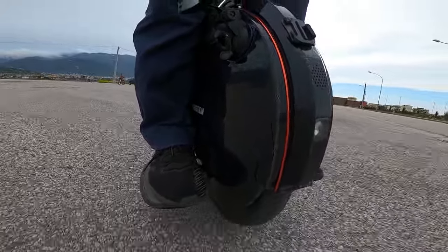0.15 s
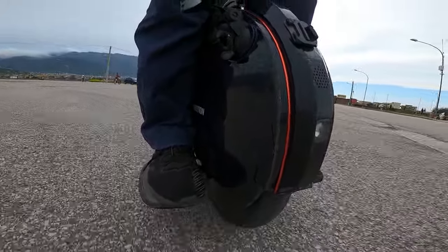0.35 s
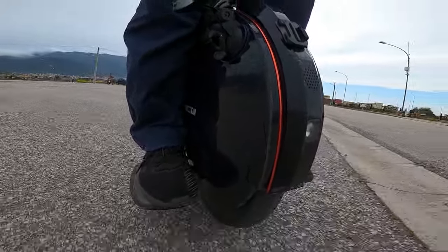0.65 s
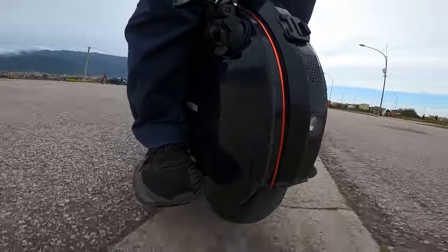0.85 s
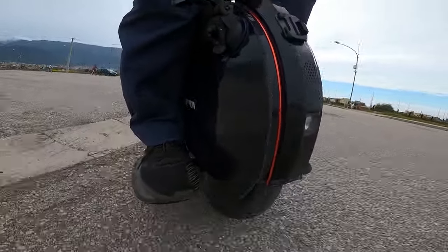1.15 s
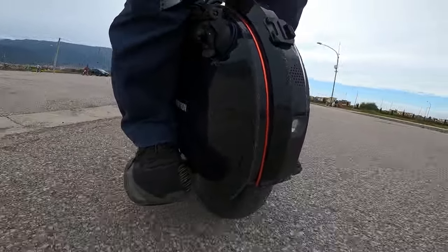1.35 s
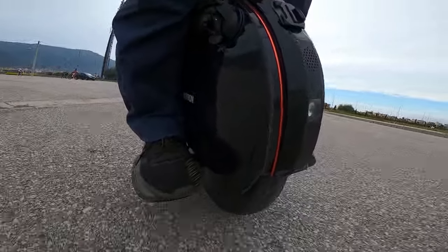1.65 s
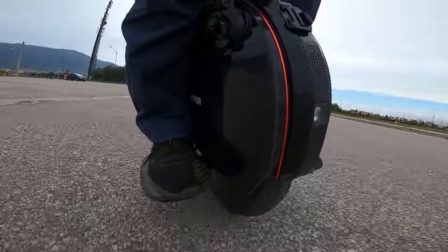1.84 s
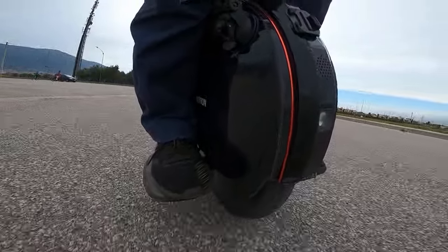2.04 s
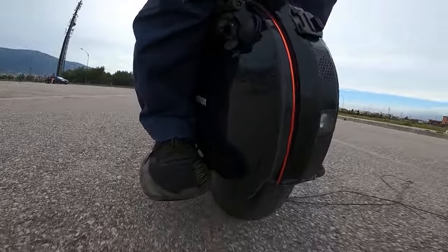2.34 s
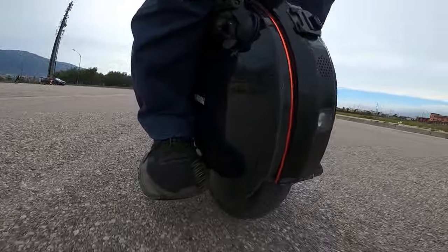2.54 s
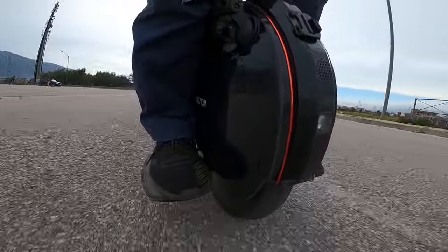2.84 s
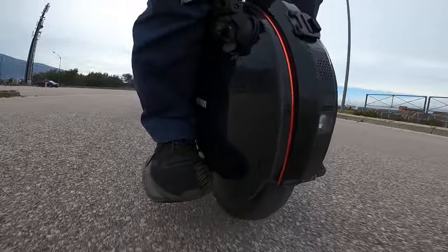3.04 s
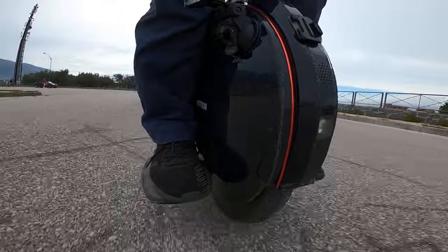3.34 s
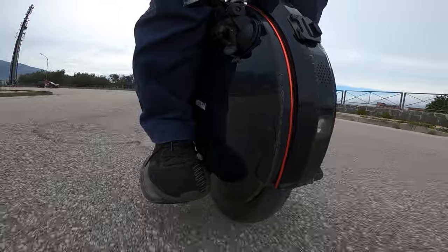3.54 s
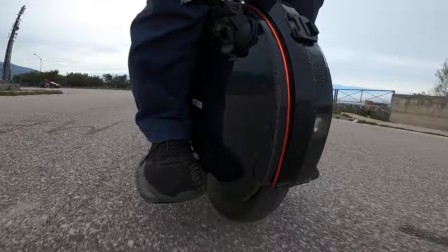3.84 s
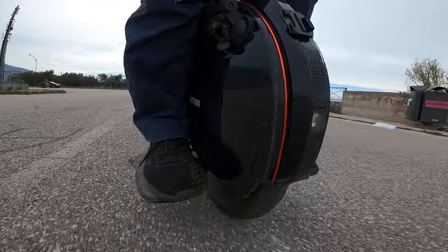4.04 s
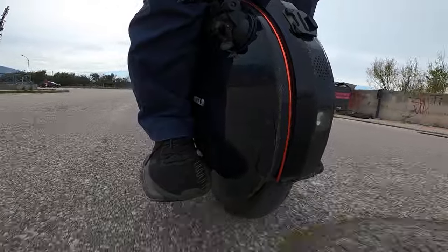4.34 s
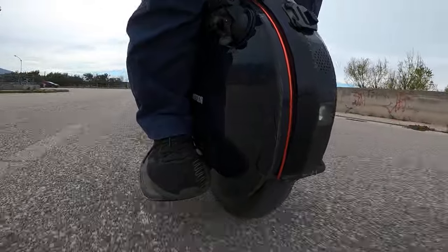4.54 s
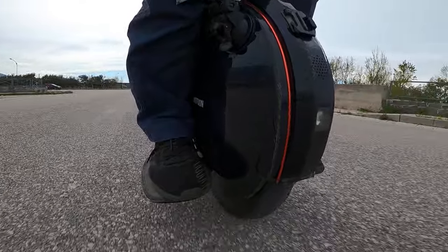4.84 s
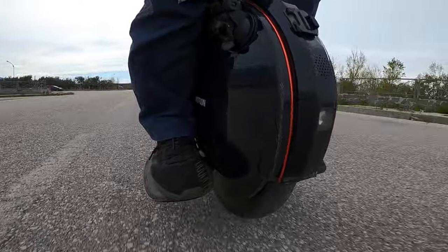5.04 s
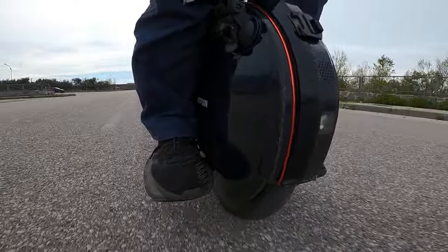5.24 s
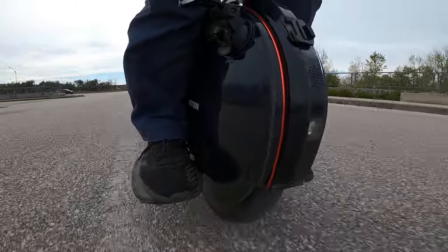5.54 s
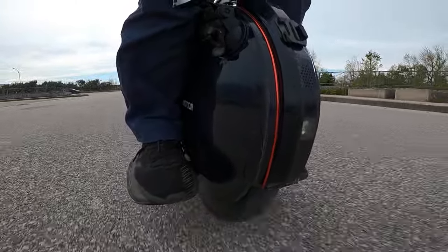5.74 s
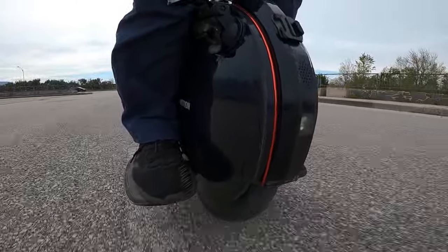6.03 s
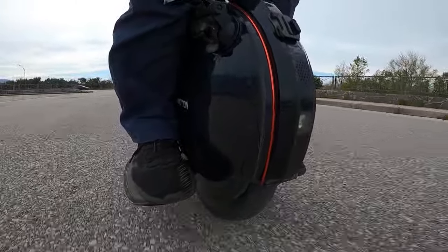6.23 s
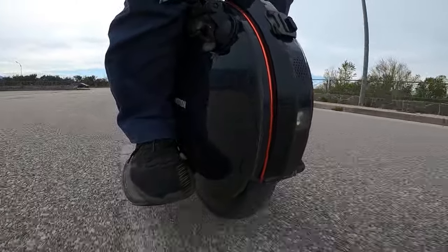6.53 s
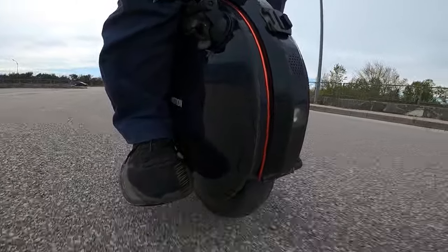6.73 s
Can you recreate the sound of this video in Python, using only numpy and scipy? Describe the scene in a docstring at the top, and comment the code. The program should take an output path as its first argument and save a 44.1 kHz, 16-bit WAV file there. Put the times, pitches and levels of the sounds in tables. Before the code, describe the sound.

A low microphone rides with a single electric wheel in open air. The tyre drums and crackles over rough asphalt, with dull hollow knocks, ticking grit and stone chips ringing the plastic shell. After a brief slowdown and a gritty concrete crossing, the faint whine climbs, the patter thickens into a steady rattling roar, and wind rumbles in soft gusts.

```python
"""An electric unicycle's tyre patters over coarse asphalt, slowing a little, then gathering speed.
Stone chips strike the tread as random clicks that ring the shell; filtered noise clicks drum the tyre.
Loose stones snap, grit ticks, sand scrapes on a concrete strip, and edges knock as short decaying sines.
The hub motor whines and hums faintly as sines; shaped noise is the wind, which grows with speed."""
import sys
import numpy as np
from scipy import signal
from scipy.fft import rfft, irfft
from scipy.io import wavfile
from scipy.ndimage import uniform_filter1d

SR = 44100
rng = np.random.default_rng(int(sys.argv[2]) if len(sys.argv) > 2 else 0)


def waveform_to_disk(signal):
    """Save audio, clipped to [-1, 1], as 16-bit WAV at the path in sys.argv[1]."""
    frames = np.transpose(np.atleast_2d(signal))
    scaled = np.clip(frames, -1, 1) * 32767
    samples = np.round(scaled).astype(np.int16)
    wavfile.write(sys.argv[1], SR, samples)


N = 303408
TIME_S = np.arange(N) / SR

# Throughout, "speed" is a fraction of top speed; levels that scale with it hold at top speed.

# Wind gusts. Each row: centre in seconds, length in seconds, rumble change in dB, flutter change in dB.
WIND_GUSTS = [(1.249, 0.17, 11, 9.5), (1.38, 0.11, 12.5, -4), (2.0, 0.37, 5, 2.5), (2.39, 0.22, 6, 6),
              (3.205, 0.14, 6.5, 7), (3.719, 0.34, 7, 6), (4.357, 0.63, 3.5, 8.5), (5.147, 0.8, 4.5, 8),
              (5.62, 0.13, 3, -0.5), (5.884, 0.11, -1.5, 4), (6.254, 0.13, 2.5, 4.5),
              (6.54, 0.14, 2.5, 2.5), (6.797, 0.23, 1, 7)]
# Wind spectra, large eddies and small ones. Each row: frequency in Hz, density in dB per Hz.
RUMBLE_SPECTRUM = [(8, -15), (25, 2), (55, 5), (75, -1.5), (110, -14.5), (230, -47), (700, -71),
                   (8000, -100)]
FLUTTER_SPECTRUM = [(20, -23), (60, -2.5), (95, 3), (125, 2), (170, -2.5), (230, -7), (350, -13),
                    (700, -27), (2000, -38), (8000, -85)]
RUMBLE_DB, RUMBLE_POWER = -25.5, 4.05  # power: exponent of speed
FLUTTER_DB, FLUTTER_POWER = -27, 3.15

# Motor whine: pitch follows wheel speed, level the torque. Each row: time in seconds, pitch in Hz, level in dB.
MOTOR_WHINE = [(0, 675.6, -42), (.5, 606, -45), (1.2, 591.5, -41.5), (1.75, 608.2, -60), (1.95, 647.2, -37),
               (2.2, 694.3, -37.5), (2.45, 735.4, -42), (2.55, 759, -41.5), (2.9, 822, -44),
               (3.1, 843, -41), (3.6, 829.6, -41), (4.2, 867, -43), (5.2, 878.7, -53), (5.8, 930, -59),
               (6.88, 939.7, -63)]
# Low motor hum, heard at low speed. Each row: time in seconds, pitch in Hz, level in dB.
MOTOR_HUM = [(0, 160, -34.5), (.3, 155, -35), (.5, 150, -40), (.8, 152, -46), (1.05, 157, -35.5),
             (1.25, 152, -37), (1.5, 154, -47), (2.1, 163, -43), (2.6, 180, -70)]
WHINE_SHAKE_RATIO, HUM_WAVER_RATIO = 0.07, 0.025  # rms pitch unsteadiness; the shake at top speed

# Smooth spots and edges in the paving.
# Each row: centre in seconds, length in seconds, contact noise change in dB.
PAVING_PATCHES = [(0.393, 0.041, -1), (.47, 0.018, -1), (0.563, 0.035, -3), (0.605, 0.014, 0),
                  (1, 0.11, -5.5), (1.036, 0.04, 5), (1.099, 0.045, -2), (1.176, 0.044, 3),
                  (1.241, 0.067, -4.5), (1.518, .025, -6.5), (1.589, 0.053, -3.5), (1.646, 0.02, 0.5),
                  (2.478, 0.084, -2), (4.006, 0.021, -2), (4.06, .04, 1.5), (4.456, 0.68, 0.5),
                  (4.116, 0.069, -6), (4.775, 0.073, -6), (6.72, 0.016, -4)]
# Fine grit on the paving. Each row: time in seconds, level in dB before GRIT_TRIM_DB.
GRIT_LEVEL = [(0, -44), (.8, -47), (2.2, -38), (3.6, -36.5), (5.2, -48.5), (6.88, -58)]
GRIT_TRIM_DB = -9.5
# Sand scrapes on the concrete strip. Each row: peak time in seconds, grain gain in dB.
SAND_SCRAPES = [(1.012, -36), (1.022, -37), (1.0295, -33), (1.0394, -28), (1.049, -29), (1.0557, -27.5),
                (1.0717, -30)]
SCRAPE_RISE_S, SCRAPE_FALL_S, SCRAPE_RING_HZ = 0.0015, 0.004, 4130
SHED_DB, SHED_DECAY_S = -42, 0.13  # grains shed by the tread after the strip
DUST_DB = -55.5  # fine dust under the tread, all the way

# Loudest loose stones.
# Each row: time in seconds, peak above 5.5 kHz in dB before STONE_TRIM_DB, ring in Hz.
LOOSE_STONES = [(.192, -37, 7540), (.293, -35, 5000), (0.3262, -27, 4480), (.492, -33, 7200),
                (0.954, -37, 6600), (1.1032, -31, 8750), (1.13, -36, 5600), (1.1966, -28, 7200),
                (1.3259, -31.5, 8450), (1.4195, -34, 8550), (1.428, -37, 5300), (1.475, -38, 6500),
                (1.721, -33, 6500), (1.9168, -27, 5570), (2.0475, -36, 6990), (2.369, -27, 6900),
                (2.721, -24.5, 8600), (2.772, -33, 5504), (3.0033, -35, 7500), (3.0567, -25, 8140),
                (3.1073, -33, 6500), (3.1633, -25.5, 7550), (3.4477, -27.5, 4970), (3.499, -33, 6980),
                (3.5488, -25, 6206), (3.5964, -25, 8424), (3.696, -31, 6000), (3.8016, -33, 7500),
                (3.857, -32, 5960), (3.9819, -27, 8000), (4.134, -33, 6800), (4.192, -29.5, 5526),
                (4.292, -30.5, 7504), (4.323, -28, 5105), (4.359, -32, 6500), (4.4156, -35.5, 7500),
                (4.5153, -35, 6007), (4.616, -25, 6034), (4.7408, -30, 5250), (4.8514, -27, 5370),
                (5.346, -34, 6800), (5.6087, -29.5, 5090), (6.127, -31, 5700), (6.2025, -29, 6110),
                (6.405, -28.5, 5370), (6.4869, -33, 7200), (6.7284, -28, 5293)]
# Sound of stone. Each row: frequency in Hz, density in dB per Hz.
STONE_SPECTRUM = [(500, -23), (1500, 7.5), (2800, 1.5), (4200, 2.5), (5500, -9.5), (8500, -7),
                  (10500, -19.5), (12500, -28.5), (14500, -29), (16000, -57)]
STONE_TRIM_DB, PINCH_S, CHATTER_S = 5.5, 0.0035, 0.011

# Knocks on edges. Each row: start in seconds, ring in Hz, envelope peak in dB, rise in seconds.
EDGE_KNOCKS = [(0.093, 260, -21, 0.015), (0.169, 261, -17, 0.016), (.602, 267.5, -16.5, 0.014),
               (0.921, 264.4, -18, 0.025), (1.03, 271, -15.5, 0.019), (1.224, 71, -28, 0.015),
               (1.367, 118, -17.5, 0.0099), (1.444, 505, -20, 0.0062), (1.695, 266, -21, 0.014),
               (2.679, 267, -15, 0.016)]

# Road unevenness that shakes the tyre. Each row: time in seconds, level in dB.
ROAD_ROUGHNESS = [(0, -26.5), (.5, -28), (.9, -25), (1.45, -29.5), (2.5, -25), (3.7, -24.5), (4.7, -28.5),
                  (5.5, -29.5), (6.65, -24.5), (6.88, -26.5)]
# Tyre resonances.
# Each row: frequency in Hz, width per pass in Hz, level over the unevenness in dB, power of speed.
TYRE_MODES = [(266, 54, -2, -0.46), (434.5, 45, -12.5, 0.93), (501.9, 44.6, -4, 0.72),
              (540, 51.3, -7.5, 0.13)]
# Carcass roar. Each row: frequency in Hz, density in dB per Hz.
CARCASS_SPECTRUM = [(40, -11), (100, -2.5), (165, -3), (205, -10), (320, -2), (380, -6), (450, -1.5),
                    (600, -3), (730, -17.5), (1200, -22.5), (4000, -81)]
CARCASS_DB, CARCASS_POWER = -5.5, 0.37  # over the unevenness

# Proud chips. Each row: time in seconds, peak in dB before CLACK_TRIM_DB, ring in Hz.
PROUD_CHIPS = [(.3247, -15, 2600), (.4214, -18, 1790), (.4525, -16, 2300), (.606, -15.5, 1710),
               (.6818, -17, 1790), (.7382, -17, 1670), (.9524, -20, 1250), (.9634, -18, 1700),
               (.9704, -20, 2900), (1.0285, -15, 3000), (1.0402, -13, 3500), (1.0562, -14, 3800),
               (1.0625, -15, 2300), (1.1795, -19, 2200), (1.1947, -15, 1830), (1.4444, -17, 1770),
               (1.508, -19.5, 2300), (1.6367, -14, 1720), (1.8128, -12, 2400), (1.9704, -15, 1990),
               (2.3002, -16, 1990), (2.4364, -13, 1900), (3.3967, -13, 1860), (3.8472, -14, 1790),
               (4.078, -13, 2400), (4.0825, -12, 3900), (4.0846, -8.5, 2600), (4.089, -12, 2600),
               (4.7411, -12, 1750), (6.6648, -14, 1650)]
CLACK_TRIM_DB, CLACK_WIDTH_HZ = 1.8, 480

# Chip on tread. Each row: frequency in Hz, density in dB per Hz.
CHIP_SPECTRUM = [(100, -17.5), (400, -0.5), (620, 3), (750, -6), (870, -1), (1600, 3), (2500, -1.5),
                 (3100, -7.5), (3900, -12), (4500, -18.5), (5000, -21), (6000, -26), (8500, -28),
                 (10500, -43.5), (13000, -83)]
# Hollow between tyre and shell. Each row: time in seconds, resonance in Hz.
SHELL_HOLLOW = [(0, 1680), (2.5, 1910), (3.6, 1730), (4.6, 1780), (5.3, 1670), (6, 1589), (6.88, 1710)]
HOLLOW_DB = 4  # resonance over the direct patter
# Shell panels. Each row: frequency in Hz, width in Hz, resonance over the direct patter in dB.
SHELL_PANELS = [(2395, 190, -10.5), (2810, 110, -3.5), (4880, 250, -9.5)]
# Sharp chips. Each row: ring in Hz, relative level in dB.
SHARP_CHIP_RINGS = [(1850, -1.5), (2300, -2), (2750, -2.5), (3400, -5), (4100, -8)]
TICKS_PER_S, TICK_DB, TICK_SPREAD_DB, TICK_WIDTH_HZ = 300, -0.5, 3.0, 1400  # level over the patter
PATTER_DB, PATTER_POWER = -27, 2.24
CHIPS_PER_S, FINE_DB, FINE_POWER = 620, 1, 0.3  # coarse chip rate; fine level over coarse

BAND_EDGE_HZ = 15800


def gain_of(db):
    """Decibels to amplitude."""
    return 10 ** (np.asarray(db) / 20)


def evened(x):
    """Scales to rms 1."""
    return x / np.sqrt(np.mean(x ** 2) + 1e-20)


def follow(rows):
    """Interpolates each column of a curve table at every sample."""
    s, *columns = np.transpose(rows)
    return [np.interp(TIME_S, s, column) for column in columns]


def add(mix, s, sound):
    """Mixes a sound in at time s, in place."""
    part = mix[max(round(s * SR), 0):][:len(sound)]
    part += sound[:len(part)]


def swell(s, length_s):
    """Smooth bump of height 1 centred on s."""
    return np.exp(-(2 * (TIME_S - s) / length_s) ** 2)


def patch(s, length_s):
    """Plateau of height 1 with quick edges, centred on s."""
    return np.exp(-(2 * (TIME_S - s) / length_s) ** 4)


def colour(x, points, size=8192):
    """Minimum-phase filter with the given spectrum: causal, so clicks keep a sharp front."""
    point_hz, point_db = np.transpose(points)
    bin_hz = abs(np.fft.fftfreq(size, 1 / SR)) + 1
    db = np.interp(np.log(bin_hz), np.log(point_hz), point_db)
    log_gain = np.log(gain_of(db))
    spectrum = np.exp(np.conj(signal.hilbert(log_gain)))
    response = np.fft.ifft(spectrum).real[:size // 2]
    return signal.oaconvolve(x, response)[:len(x)]


def resonate(x, hz, width_hz):
    """Resonance of gain 1 with a movable centre: shift to 0 Hz, one-pole lowpass, shift back."""
    turn = np.exp(2j * np.pi * np.cumsum(hz * np.ones(len(x))) / SR)
    pole = np.exp(-np.pi * width_hz / SR)
    return 2 * (turn * signal.lfilter([1 - pole], [1, -pole], x / turn)).real


def drift(corner_hz):
    """Slow random motion of rms 1: lowpassed noise."""
    spectrum = rfft(rng.standard_normal(N))
    rolloff = (1 + (np.fft.rfftfreq(N, 1 / SR) / corner_hz) ** 2) ** 2
    return evened(irfft(spectrum / rolloff, N))


def impacts(per_s, spread_db):
    """Random clicks with log-normal sizes, rms 1."""
    size = gain_of(spread_db * np.clip(rng.standard_normal(N), -2, 2))
    sign = rng.choice([-1, 1], N)
    return evened(size * sign * (rng.random(N) < per_s / SR))


def steady(x, span_s):
    """Holds power at 1 over the span, keeping the faster grain."""
    power = abs(uniform_filter1d(x ** 2, int(span_s * SR) + 1))
    return x / np.sqrt(power + 1e-9)


def wind(speed):
    """Large eddies at the microphone rumble, small ones flutter; both grow steeply with speed."""
    rumble_db = RUMBLE_DB + sum(db * swell(s, length_s) for s, length_s, db, _ in WIND_GUSTS)
    flutter_db = FLUTTER_DB + sum(db * swell(s, length_s) for s, length_s, _, db in WIND_GUSTS)
    out = np.zeros(N)
    for level_db, power, spectrum in ((rumble_db, RUMBLE_POWER, RUMBLE_SPECTRUM),
                                      (flutter_db, FLUTTER_POWER, FLUTTER_SPECTRUM)):
        eddies = steady(colour(rng.standard_normal(N), spectrum), span_s=0.21)
        out += gain_of(level_db) * speed ** power * eddies
    return out


def motor(whine_hz, whine_db, speed):
    """Two neighbouring orders of the hub motor, shaken by the road at speed, and a wavering low hum."""
    shake = 1 + WHINE_SHAKE_RATIO * speed ** 8 * drift(50)
    flutter = gain_of(6 * speed ** 5 * (np.clip(drift(14), -2, 1.3) - 0.6))
    phase = 2 * np.pi * np.cumsum(whine_hz * shake) / SR
    whine = evened(np.sin(phase) + gain_of(-10) * np.sin(phase * 1.127))
    hum_hz, hum_db = follow(MOTOR_HUM)
    waver = 1 + HUM_WAVER_RATIO * drift(12)
    hum = evened(np.sin(2 * np.pi * np.cumsum(hum_hz * waver) / SR))
    hum_gain = gain_of(hum_db + 2.5 * drift(10))
    return gain_of(whine_db) * whine * flutter + hum_gain * hum


def stone_coloured(clicks):
    """Gives clicks the bright sound of stone at unchanged power."""
    return np.std(clicks) * evened(colour(clicks, STONE_SPECTRUM))


def grit(paving_db):
    """Grit ticks in clumps; sand crunches in quick scrapes on the concrete and is shed again."""
    grit_db, = follow(GRIT_LEVEL)
    clumps = gain_of(3.5 * np.clip(drift(35), -2, 1.6))
    ticks = evened(impacts(1100, spread_db=6.0) * clumps)
    ticks = gain_of(grit_db + paving_db + GRIT_TRIM_DB) * ticks

    crunch = np.zeros(N)
    for s, db in SAND_SCRAPES:
        decay = np.maximum((s - TIME_S) / SCRAPE_RISE_S, (TIME_S - s) / SCRAPE_FALL_S)
        crunch += gain_of(db) * np.exp(-decay)
    age_s = TIME_S - SAND_SCRAPES[0][0]
    shed = gain_of(SHED_DB) * (age_s > 0) * np.exp(-abs(age_s) / SHED_DECAY_S)
    dust = gain_of(DUST_DB + paving_db) * clumps

    grains = impacts(2500, spread_db=4.5) + gain_of(-8) * rng.standard_normal(N)
    grains = steady(grains, span_s=0.008)
    scrape = crunch * (grains + 0.4 * resonate(grains, SCRAPE_RING_HZ, width_hz=1500))
    return stone_coloured(ticks + scrape + (shed + dust) * grains)


def stones(size=4096):
    """Each loose stone grinds as it is pinched, snaps free at its own pitch, then chatters briefly."""
    out, t = np.zeros(N), np.arange(size) / SR
    treble = signal.butter(2, 5500, "high", fs=SR)
    lead_s = 0.015  # room for the grind before the snap
    grind = np.exp(-np.maximum((lead_s - t) / PINCH_S, (t - lead_s) / CHATTER_S))
    for s, db, hz in LOOSE_STONES:
        grains = rng.uniform(-1.17, 1.0, size) * (rng.random(size) < 3000 / SR)
        clicks = gain_of(-13) * grind * grains
        clicks[round(lead_s * SR)] = 1
        snap = colour(clicks, STONE_SPECTRUM)
        snap = snap + 1.8 * resonate(snap, hz, width_hz=1300)
        treble_peak = abs(signal.lfilter(*treble, snap)).max()
        add(out, s + 0.000897 - lead_s, gain_of(db + STONE_TRIM_DB) * snap / treble_peak)
    return out


def bumps():
    """An edge sets the tyre swinging for a few cycles."""
    out, t = np.zeros(N), np.arange(SR // 2) / SR
    for s, hz, db, rise_s in EDGE_KNOCKS:
        envelope = (t / rise_s * np.exp(1 - t / rise_s)) ** 2
        add(out, s, gain_of(db) * envelope * np.sin(2 * np.pi * hz * t))
    return out


def tyre(speed, paving_db):
    """The rough road shakes the inflated tyre: narrow rings over a dull carcass roar."""
    road_db, = follow(ROAD_ROUGHNESS)
    roar = evened(colour(impacts(1500, spread_db=4.5), CARCASS_SPECTRUM))
    out = gain_of(CARCASS_DB) * speed ** CARCASS_POWER * roar
    for hz, width_hz, db, power in TYRE_MODES:
        ring = resonate(impacts(1500, spread_db=1.0), hz, width_hz)
        ring = resonate(ring, hz, width_hz)
        out = out + gain_of(db) * speed ** power * steady(ring, span_s=0.25)
    return gain_of(road_db + paving_db) * out


def clacks(size=2048):
    """Single hard strikes of the chips that stand highest."""
    out = np.zeros(N)
    strike = colour(signal.unit_impulse(size), CHIP_SPECTRUM)
    for s, db, hz in PROUD_CHIPS:
        ring = evened(resonate(strike, hz, width_hz=CLACK_WIDTH_HZ))
        clack = evened(strike) + 1.5 * ring
        add(out, s + 0.001, gain_of(db + CLACK_TRIM_DB) * clack / abs(clack).max())
    return out


def sharp_chips(speed):
    """Sharp chips tick out of the patter, each at one of a few pitches drawn at random."""
    passed = np.floor(np.cumsum(TICKS_PER_S * speed * np.exp(0.6 * drift(150))) / SR)
    size = gain_of(TICK_SPREAD_DB * np.clip(rng.standard_normal(N), -2, 1.5))
    clicks = np.diff(passed, prepend=0) * size * rng.choice([-1, 1], N)
    kind = rng.integers(0, len(SHARP_CHIP_RINGS), N)
    rings = np.zeros(N)
    for k, (hz, db) in enumerate(SHARP_CHIP_RINGS):
        strikes = colour(clicks * (kind == k), CHIP_SPECTRUM)
        rings += gain_of(db) * evened(resonate(strikes, hz, TICK_WIDTH_HZ))
    return gain_of(TICK_DB) * steady(rings, span_s=0.07)


def body(strikes):
    """Strikes on the tread ring the hollow of the shell and its plastic panels."""
    direct = colour(strikes, CHIP_SPECTRUM)
    hollow_hz, = follow(SHELL_HOLLOW)
    hollow = gain_of(HOLLOW_DB) * resonate(direct, hollow_hz, width_hz=140)
    panels = sum(gain_of(db) * resonate(direct, hz, width_hz) for hz, width_hz, db in SHELL_PANELS)
    return direct + panels + hollow


def tread(speed, paving_db):
    """Chips strike the tread: a fine patter that grows denser, brighter and louder with speed."""
    # chips lie side by side, so strikes come fairly evenly
    passed = np.floor(np.cumsum(CHIPS_PER_S * speed * np.exp(0.7 * drift(400))) / SR)
    size = gain_of(4.5 * np.clip(rng.standard_normal(N), -2, 2)) * rng.choice([-1, 1], N)
    coarse = evened(np.diff(passed, prepend=0) * size / np.sqrt(speed))
    fine = gain_of(FINE_DB) * speed ** FINE_POWER * impacts(6000, spread_db=2.0)
    strikes = coarse + fine
    # faster strikes are harder and brighter
    strikes = strikes + speed ** 4 * resonate(strikes, 3840, width_hz=1100)
    patter = steady(body(strikes), span_s=0.099) + sharp_chips(speed)
    return gain_of(PATTER_DB + paving_db) * speed ** PATTER_POWER * patter


def scene():
    """Wheel speed, read from the whine, drives wind, motor, tyre and tread."""
    whine_hz, whine_db = follow(MOTOR_WHINE)
    speed = whine_hz / whine_hz.max()
    paving_db = sum(db * patch(s, length_s) for s, length_s, db in PAVING_PATCHES)
    background = wind(speed) + motor(whine_hz, whine_db, speed)
    debris = grit(paving_db) + stones()
    rolling = bumps() + tyre(speed, paving_db) + clacks() + tread(speed, paving_db)
    return (background + debris + rolling)[None]


def record(dry):
    """Linear-phase lowpass at the upper band limit."""
    lowpass = signal.firwin(511, BAND_EDGE_HZ, window=("kaiser", 9), fs=SR)
    return signal.oaconvolve(dry, lowpass[None], "same")


dry = scene()
out = record(dry)
waveform_to_disk(out)
```